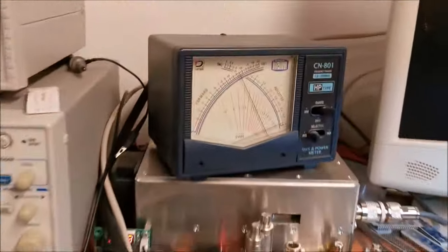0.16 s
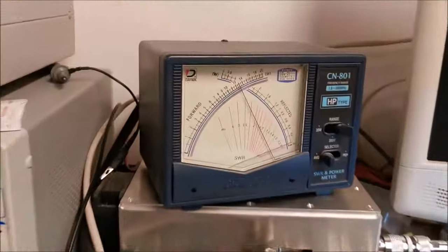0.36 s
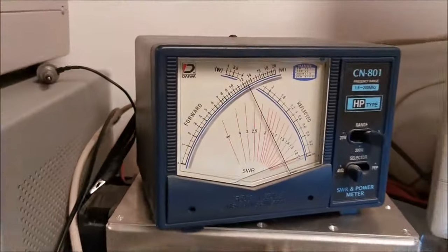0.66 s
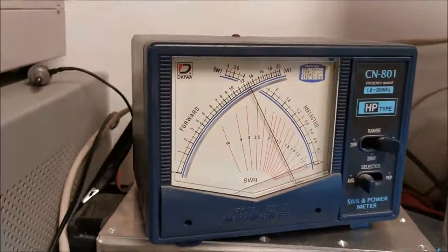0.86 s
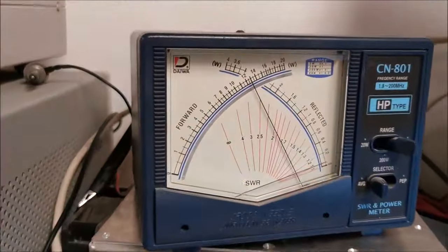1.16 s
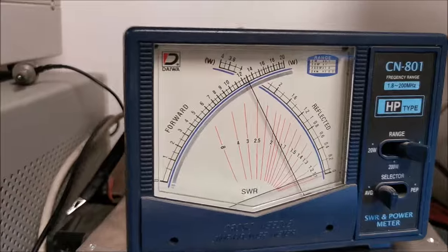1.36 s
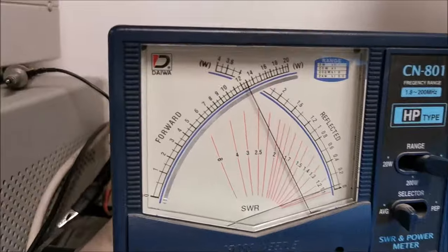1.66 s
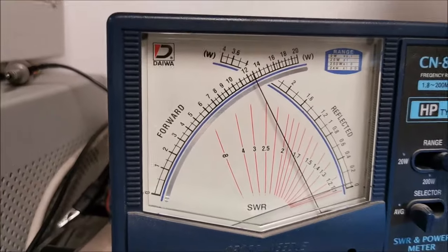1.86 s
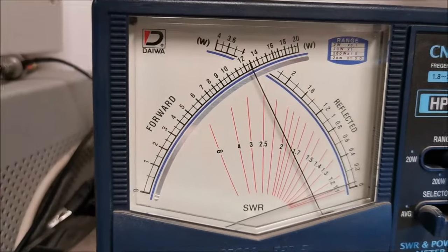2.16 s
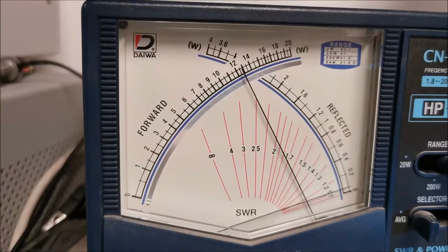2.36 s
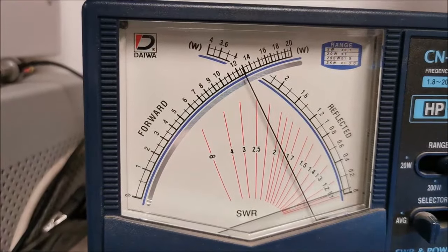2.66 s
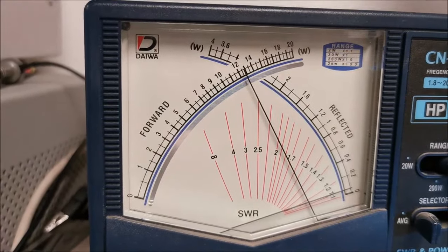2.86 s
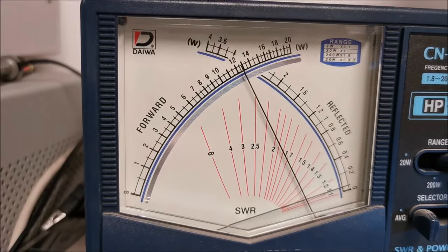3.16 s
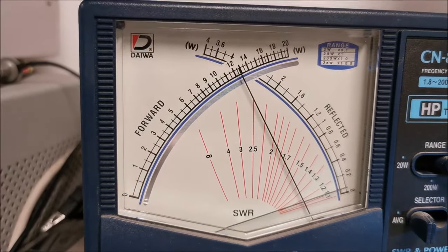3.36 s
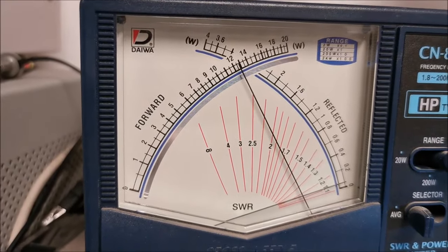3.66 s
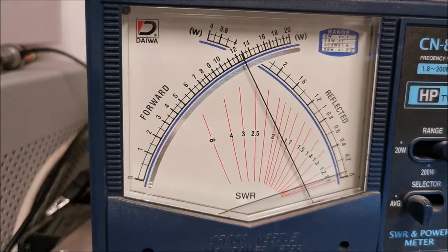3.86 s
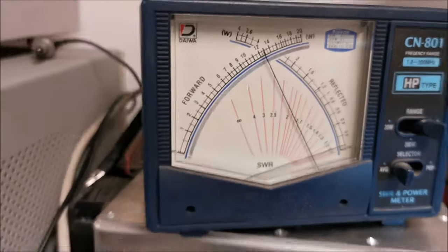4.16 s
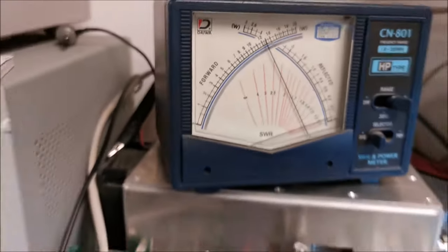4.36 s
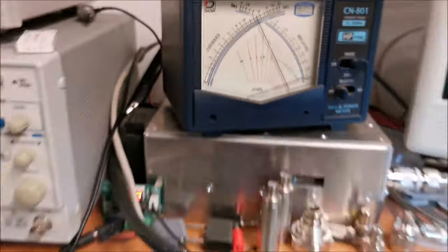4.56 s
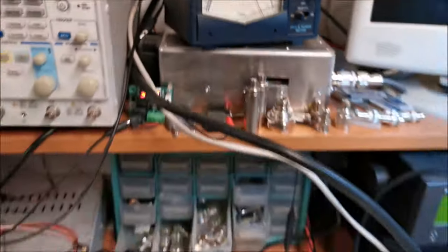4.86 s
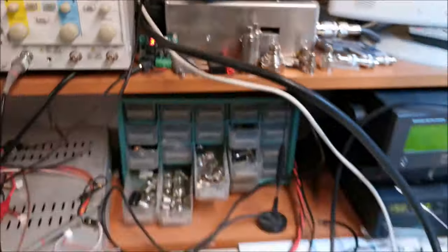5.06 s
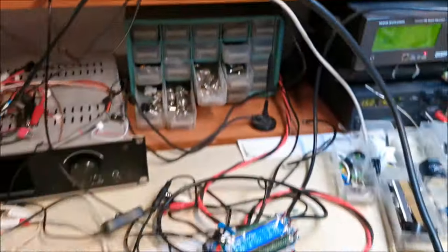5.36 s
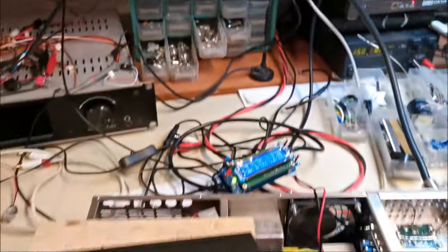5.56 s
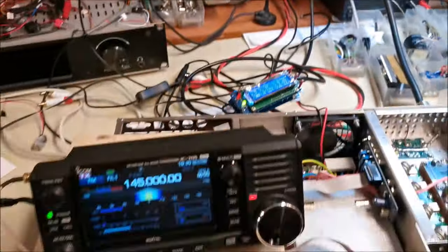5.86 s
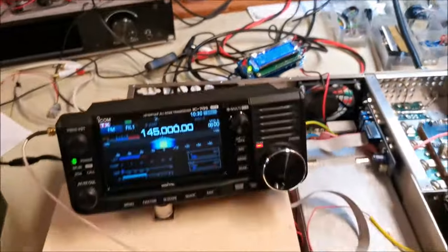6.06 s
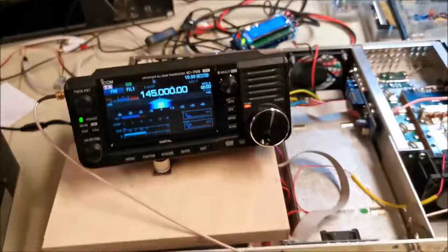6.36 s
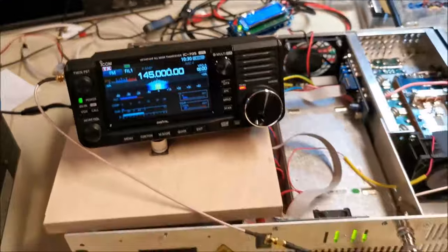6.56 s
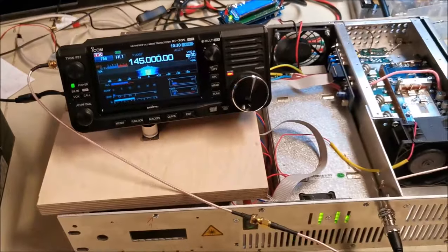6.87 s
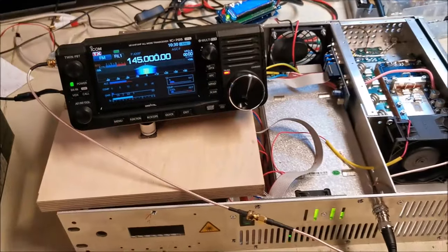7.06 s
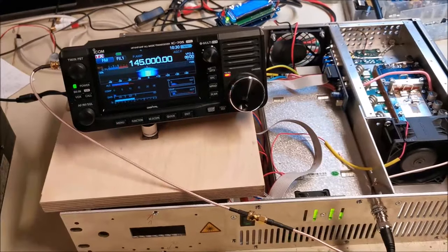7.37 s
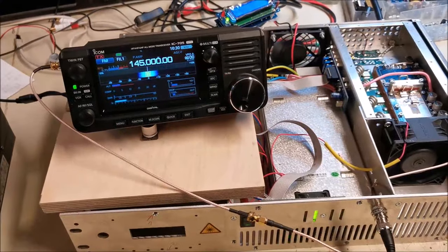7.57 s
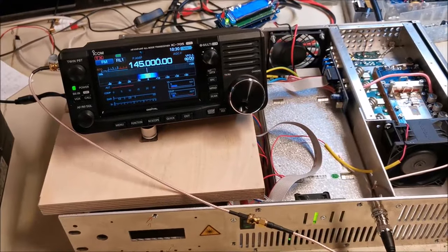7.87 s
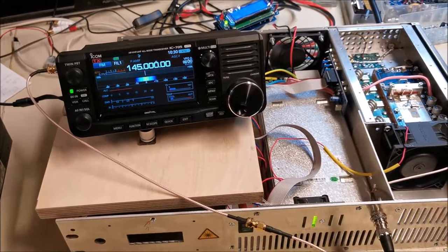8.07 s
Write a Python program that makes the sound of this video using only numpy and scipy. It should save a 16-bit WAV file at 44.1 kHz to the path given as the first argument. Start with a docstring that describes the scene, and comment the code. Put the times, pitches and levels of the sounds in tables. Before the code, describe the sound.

Rushing air and a high, steady-pitched whine come from an amplifier's cooling fan on a workbench, with a faint hum underneath. Heard through a moving phone microphone, the whine grows stronger toward the middle, then wavers and weakens, and the air briefly sounds hollow. A few short finger taps on the microphone come near the start, and faint soft thumps pass.

```python
"""A small, fast nine-bladed fan cools an amplifier on a workbench, heard from a phone's two microphones.
The phone moves from a shelf down to the open case. The fan sings its shaft orders (multiples of its
turning rate) over rushing air; standing waves swell and cancel the tones as the phone crosses them.
A slow machine hums underneath with a thin whistle, a finger bumps the right microphone port,
and a few soft thumps pass."""
import sys
import numpy as np
from scipy import signal
from scipy.io import wavfile
from scipy.ndimage import uniform_filter1d

SR = 44100
rng = np.random.default_rng(int(sys.argv[2]) if len(sys.argv) > 2 else 0)


def master(y):
    """Save y as 16-bit WAV."""
    cut = np.clip(np.atleast_2d(y).T, -1, 1)
    pcm = np.round(cut * 32767)  # scale
    wavfile.write(sys.argv[1], SR, pcm.astype(np.int16))


N = 362138
T = np.arange(N) / SR


def gain_of(db):
    """Decibels to gain."""
    return 10 ** (np.asarray(db) / 20)


def unit_rms(x):
    """Scales to rms 1."""
    return x / np.sqrt(np.mean(abs(x) ** 2) + 1e-20)


def spectrum_at(points, hz):
    """Reads a spectrum on a log-frequency axis."""
    f, value = np.transpose(points)
    return np.interp(np.log(hz + 1), np.log(f + 1), value)


def columns(rows, t):
    """Every column of a curve table at the times t."""
    times, *values = np.transpose(rows)
    return np.array([np.interp(t, times, v) for v in values])


def wobble(width_hz):
    """Complex noise low-passed to the given width, rms about 1."""
    coarse, pole = T[::20], np.exp(-2 * np.pi * width_hz * 20 / SR)
    noise = rng.standard_normal(len(coarse)) + 1j * rng.standard_normal(len(coarse))
    return np.interp(T, coarse, unit_rms(signal.lfilter([1], [1, -2 * pole, pole * pole], noise)))


def resonance(hz, centre_hz, width_hz):
    """Power of a resonance, 1 at its centre."""
    return 1 / (1 + (2 * (hz - centre_hz) / width_hz) ** 2)


def shaft_order(cycles, level_db, lead, rough, width_hz):
    """One fan tone at both microphones; eddies hitting the blades shake its size and phase."""
    shaken = (1 + rough * wobble(width_hz)) * np.exp(2j * np.pi * (cycles + rng.random()))
    return np.sqrt(2) * gain_of(level_db) * np.array([(shaken * np.exp(1j * lead)).real, shaken.real])


# Microphone position: (time [s], place [0 shelf, 1 case], hollow roar [dB], bass and treble swell [dB])
PHONE_PATH = [(0, 0.63, 9, -0.5), (.4, 0.54, 7.5, -1), (.9, 0.5, 7.5, 1.5), (1.2, 0.4, 1, 0.5),
              (1.5, 0.4, 3, -1), (1.9, 0.37, -1.5, -2), (2.6, 0.37, -2.5, -2), (3.8, 0.36, -4, -1.5),
              (4.3, 0.37, -1, -1), (4.8, 0.57, 7.5, 2), (5.1, 0.68, 11.5, 0), (5.4, .9, 9, -4),
              (5.6, 0.9, 5, -3), (5.8, 0.93, 6, -2.5), (6.1, 0.93, 2, 1), (6.6, 0.92, 2, -0.5),
              (7.2, 0.85, -5, 1), (7.7, 0.86, -1, -0.5), (8.2, 0.85, 1, 1)]
def phone_at(t):
    """The phone's place, and how that spot colours the air, at the times t."""
    return columns(PHONE_PATH, t)


# Fan shaft: (time [s], speed [turns/s])
SHAFT_SPEED = [(0, 155.2), (.35, 154.4), (.7, 154.1), (1.7, 154.3), (2.2, 154.4), (2.7, 155), (4.2, 155.1),
               (5.2, 155.45), (6.5, 155.45), (8.2, 155.6)]
def shaft_hz(t):
    """The fan's slightly drifting turning rate."""
    return columns(SHAFT_SPEED, t)[0]


# Blade-pass tone, its octave and the motor tone at the moving microphones:
# (time [s], left level [dB], right level [dB], left phase lead [rad])
BLADE_PASS = [(0, -56, -48, -2.5), (.07, -53, -45, -1.5), (.15, -55, -41.5, -1.5), (.19, -60, -58, -4),
              (.22, -60, -41, 1), (.38, -62, -42, -1.5), (.48, -55, -41, -1.3), (.62, -59, -47, -0.8),
              (.78, -53, -49, -2), (.93, -52, -54, -1), (1, -52, -68, -4), (1.08, -50, -55, -5.5),
              (1.3, -47.5, -55, -6.5), (1.5, -47, -47.5, -6), (1.9, -43.5, -42.5, -5.5),
              (2.1, -44.5, -41, -6.5), (2.3, -44.5, -40, -6), (2.37, -51, -44, -6.5),
              (2.45, -42, -37.5, -5), (2.55, -45.5, -38.5, -8), (4.12, -44.5, -39, -5.5),
              (4.32, -46.5, -40.5, -7), (4.41, -53, -50, -5), (4.48, -55, -56, -8.5),
              (4.58, -63, -40, -7.5), (4.64, -59, -41.5, -6), (4.73, -47, -38.5, -5.5),
              (4.78, -61, -43, -5.5), (4.86, -61, -49, -10.5), (4.91, -48, -44, -2.5),
              (4.96, -57, -48, -6.5), (5, -59, -67, -5), (5.04, -58, -43, -1.5), (5.09, -60, -55, -2.5),
              (5.14, -47, -41, -5.5), (5.2, -59, -51, -3), (5.3, -50, -42, -8.5), (5.4, -55, -39.5, -8),
              (5.64, -52.5, -41.5, -8), (5.9, -55.5, -48, -8), (6.6, -59, -48.5, -7.5),
              (6.72, -65, -52, -10), (6.82, -58, -65, -3.5), (6.96, -59, -48.5, -5), (7.08, -61, -48, -5.5),
              (7.14, -63, -55, -4.5), (7.38, -67, -48, -2.5), (7.52, -53, -49, -6.5), (7.57, -60, -59, -2),
              (7.64, -60, -46, -9), (7.7, -59, -59, -8), (7.8, -60, -50, -8.5), (7.92, -64, -56, -11),
              (8, -66, -50, -7.5), (8.2, -69, -69, -5)]
BLADE_OCTAVE = [(0, -70, -53, 0), (.15, -70, -57, 1), (.3, -70, -58, 0.5), (.4, -66, -54.5, 2),
                (.65, -66, -61, .5), (1, -65, -63, 0), (1.8, -67, -63, 8), (2.3, -60, -58.5, 7.5),
                (3.2, -67, -56.5, 7), (3.6, -65, -58.5, 6.5), (4.22, -66.5, -69, 7.5),
                (4.44, -61, -51, 4.5), (4.55, -70, -62, 9), (4.65, -68, -53, 6), (4.77, -72, -67, 6),
                (5, -55, -47, 8), (5.08, -68, -54, 6.5), (5.15, -57, -64, 4), (5.27, -63, -54, 5),
                (5.6, -68, -54, 3.5), (5.78, -68, -53.5, 4), (5.92, -66, -48, 2), (6.1, -65, -56, 4),
                (6.3, -63, -59, 3), (7.2, -63, -63, 5), (7.32, -61, -55, 8), (7.72, -65, -72, 6.5),
                (8.2, -60, -61, 12)]
MOTOR_TONE = [(0, -59, -70, 2.9), (.4, -54, -49, 1.9), (.65, -59, -51.5, 1.3), (1.1, -59, -70, 1.4),
              (1.4, -69, -64, 1.7), (2.1, -58.5, -55.5, 2.7), (4.2, -58, -53.5, 2.4), (4.4, -63, -54, 2.3),
              (4.6, -56, -61, .6), (4.8, -58, -52, 1.3), (5.05, -67, -63, 5.3), (5.3, -52, -50.5, 5.7),
              (6, -52, -55, 6.3), (6.5, -53.5, -53, 5.8), (8.2, -55.5, -50, 6.2)]
def main_tones(turns, place):
    """Blades and motor through standing waves; over the case the blade tones flutter more."""
    out = np.zeros((2, N))
    octave_rough = .36 * (1 + .4 * place)  # breathier over the case
    for order, rows, rough, width_hz, flutter_db in (
            (9, BLADE_PASS, .13, 32, 1.3),
            (18, BLADE_OCTAVE, octave_rough, 90, 1.3),
            (8, MOTOR_TONE, .08, 8, 0)):
        *level_db, lead = columns(rows, T)
        level_db = level_db + flutter_db * (.5 + place) * wobble(width_hz=8.5).real
        out += shaft_order(order * turns, level_db, lead, rough, width_hz)
    return out


# Third and fourth multiples of the blade rate:
# (time [s], third left [dB], third right [dB], fourth left [dB], fourth right [dB])
UPPER_OVERTONES = [(0, -72, -80, -74, -74), (.5, -60, -71, -73, -65), (.75, -65, -67, -77, -72),
                   (1, -67, -69, -78, -69), (1.3, -69, -62, -80, -66), (1.5, -68, -72, -82, -73),
                   (1.8, -78, -63, -69, -66), (2.3, -76, -62, -76, -69), (2.7, -69, -76, -78, -81),
                   (3.1, -71, -72, -83, -80), (3.5, -68, -68.5, -79.5, -68.5), (3.9, -66, -72, -78, -76),
                   (4.15, -70, -62, -77, -69), (4.5, -74, -66.5, -81, -62), (5, -65, -71, -83, -65),
                   (5.3, -73, -64, -82, -66), (5.5, -70, -62, -82, -67), (6, -72, -69, -74, -79),
                   (6.7, -73, -68, -84, -71), (7.2, -73, -67, -76, -78), (7.65, -74, -66.5, -83, -75),
                   (7.9, -76, -69, -83, -83), (8.2, -72, -66.5, -78, -71)]
def upper_overtones(turns, place):
    """High blade overtones, rougher as the phone nears the case."""
    levels_db = columns(UPPER_OVERTONES, T).reshape(2, 2, N)
    return sum(shaft_order(order * turns, db, lead=.81, rough=.03 * order * (.5 + place), width_hz=150)
               for order, db in zip((27, 36), levels_db))


# Weak fan tones: (order, shelf left [dB], shelf right [dB], case left [dB], case right [dB],
# roughness, left phase lead [rad], shake width [Hz])
WEAK_ORDERS = [(1, -66, -64, -71, -75.5, 0.099, 0.27, 5.5), (2, -78, -80, -98, -95, .4, 0.46, 16),
               (24, -95, -93, -82, -80, .3, .5, 16), (7, -76, -83, -85, -74, 0.33, 0.54, 10),
               (12, -81, -63, -91, -68, 0.43, 0.71, 12), (45, -73, -73, -78, -79, 0.71, 1.4, 150)]
# Faint fan tones, equally loud by shelf and case: (order, left level [dB], right level [dB])
FAINT_ORDERS = [(4, -82, -78), (14, -80, -74), (20, -81, -74), (29, -82, -72)]
def quiet_orders(turns, place):
    """The lesser multiples of the shaft rate, behind the main tones."""
    out = np.zeros((2, N))
    for order, *ports_db, rough, lead, width_hz in WEAK_ORDERS:
        shelf_db, case_db = np.reshape(ports_db, (2, 2, 1))
        level_db = (1 - place) * shelf_db + place * case_db
        out += shaft_order(order * turns, level_db, lead, rough, width_hz)
    for order, *ports_db in FAINT_ORDERS:
        out += shaft_order(order * turns, np.array(ports_db)[:, None], lead=.48, rough=.59, width_hz=16)
    return out


# Hiss bands, relative to the air: (blade-rate multiple, width [Hz], by the shelf [dB], over the case [dB])
HISS_BANDS = [(0.998, 87, 10.5, 12), (.96, 156, 5.5, 7.5), (2.04, 440, -1.5, 2.5), (2.17, 220, -11, 1),
              (3.0, 565, 0, 8), (3.8, 900, -7, 2), (5, 300, -3, 0)]
def blade_turbulence(hz, t, place):
    """Noise power that turbulence spreads around multiples of the blade rate."""
    usual_db = -63  # of the upper overtones on the right; the hiss around them swells as they do
    _, third_db, _, fourth_db = columns(UPPER_OVERTONES, t) - usual_db
    swell_db = {3: .92 * third_db, 4: .92 * fourth_db}
    blade_hz = 9 * shaft_hz(t)
    power = 0
    for multiple, width_hz, shelf_db, case_db in HISS_BANDS:
        level_db = (1 - place) * shelf_db + place * case_db + swell_db.get(round(multiple), 0)
        power += gain_of(level_db) ** 2 * resonance(hz, multiple * blade_hz, width_hz) ** 2
    return power


# Resonances of the hollow roar, among them the amplifier chassis ringing near 650 Hz: (frequency [Hz], width
# [Hz], relative level [dB])
HOLLOW_MODES = [(569, 85, 2), (651, 76, 4), (755, 46, 0.5), (1060, 1500, -8)]
def hollow_roar(hz, hollow_db):
    """Power that the hollow roar, with the chassis ringing, adds to the air."""
    return sum(gain_of(hollow_db + db) ** 2 * resonance(hz, f, width) for f, width, db in HOLLOW_MODES)


# Air at each microphone, by the shelf and over the case: (frequency [Hz], base density [dB per Hz])
AIR_SHELF_LEFT = [(40, -87), (100, -89), (240, -107), (310, -93), (450, -95), (590, -101), (680, -92.5),
                  (950, -96), (1600, -85), (2200, -92.5), (3500, -93.5), (6800, -94), (10000, -100),
                  (15500, -102)]
AIR_SHELF_RIGHT = [(40, -99), (100, -100), (230, -108), (320, -92.5), (450, -88.5), (590, -99.5),
                   (680, -87), (950, -88.5), (1750, -84), (2300, -80), (3700, -90), (5200, -86),
                   (6300, -92), (7800, -105), (10500, -102), (14000, -118), (15500, -112)]
AIR_CASE_LEFT = [(40, -101), (110, -99), (250, -93), (360, -96.5), (480, -100.5), (680, -97), (950, -89.5),
                 (1700, -96), (2200, -94), (3500, -94), (6800, -92), (10000, -101), (15500, -103)]
AIR_CASE_RIGHT = [(40, -103), (110, -102), (250, -93.5), (360, -97.5), (480, -99), (660, -88.5),
                  (800, -90.5), (1050, -89), (1750, -89), (2300, -86), (3700, -85.5), (5600, -88.5),
                  (6300, -95.5), (7800, -108), (10500, -100), (12500, -106), (14000, -121), (15500, -112)]
# Likeness of the air at the two microphones: (frequency [Hz], coherence [0-1])
AIR_COHERENCE = [(60, .8), (290, .85), (500, .75), (690, .85), (1400, .7), (1900, .35), (3100, .33),
                 (5000, .25), (7500, .02)]
def rushing_air():
    """The fan's airflow: random short-time spectra, coloured by where the phone is."""
    frames, hz = N // 512 + 5, np.fft.rfftfreq(2048, 1 / SR)[:, None]
    t = np.arange(frames) * 512 / SR
    place, hollow_db, swell_db = phone_at(t)
    left_re, left_im, apart_re, apart_im, patches, *comb = rng.standard_normal((frames, 1025, 7)).T

    left, apart = left_re + 1j * left_im, apart_re + 1j * apart_im
    right_lag_s = .00013 * (1 - place)  # by the shelf the left microphone hears first
    coherence = spectrum_at(AIR_COHERENCE, hz) * np.exp(-2j * np.pi * hz * right_lag_s)
    right = coherence * left + np.sqrt(1 - abs(coherence) ** 2) * apart

    shelf_db = np.array([spectrum_at(AIR_SHELF_LEFT, hz), spectrum_at(AIR_SHELF_RIGHT, hz)])
    case_db = np.array([spectrum_at(AIR_CASE_LEFT, hz), spectrum_at(AIR_CASE_RIGHT, hz)])
    level_db = (1 - place) * (shelf_db + 1) + place * (case_db - 1)
    treble, bass = 1 / (1 + (7000 / (hz + 1)) ** 4), 1 / (1 + (hz / 450) ** 6)
    level_db += (.58 * treble + .46 * bass) * swell_db
    level_db -= .21 * bass * np.maximum(hollow_db, 0)  # the bass thins as the hollow roars

    # the treble flickers, and patches of the spectrum swell and fade
    flicker = unit_rms(uniform_filter1d(rng.standard_normal(frames), size=4))
    level_db += .5 * flicker / (1 + (5000 / (hz + 1)) ** 4)
    patches = uniform_filter1d(patches, size=40, axis=0)
    level_db += .79 * unit_rms(uniform_filter1d(patches, size=16, axis=1))
    # reflections from bench and walls comb each side; the comb drifts as the phone moves
    comb = uniform_filter1d(np.array(comb), size=4, axis=1)
    comb = unit_rms(uniform_filter1d(comb, size=90, axis=2))
    level_db += 2.54 * comb * (1 - .48 * treble) * hz / (hz + 400)

    power = 1 + blade_turbulence(hz, t, place) + hollow_roar(hz, hollow_db)
    spectra = np.array([left, right]) * gain_of(level_db) * np.sqrt(power)
    white_rms = signal.istft(left, nperseg=2048, noverlap=1536)[1].std()
    air = signal.istft(spectra, nperseg=2048, noverlap=1536)[1][:, :N]
    return air / white_rms * np.sqrt(SR / 2)


def whistle(place, hollow_db, pitch_hz=750):
    """A thin wavering tone, lifted by the hollow under the shelf and fainter over the case."""
    tone = unit_rms(1 + .6 * wobble(width_hz=2.8)) * np.exp(2j * np.pi * pitch_hz * T)
    level_db = -71.5 + .6 * hollow_db - 6 * place
    return np.sqrt(2) * gain_of(level_db) * tone.real * gain_of([[-2.5], [2.5]])


# Machine hum by the shelf: (frequency [Hz], left level [dB], right level [dB], drop over the case [dB])
HUM_TONES = [(20.46, -67, -68.5, .3), (40.92, -72.5, -74.5, 1), (99.98, -81.5, -80.5, 6)]
def machine_hum(place):
    """Steady low tones of a slow machine, in phase at both microphones."""
    out = np.zeros((2, N))
    for hz, left_db, right_db, drop_db in HUM_TONES:
        level_db = np.array([[left_db], [right_db]]) - drop_db * place
        out += gain_of(level_db) * np.sin(2 * np.pi * (hz * T + rng.random()))
    return np.sqrt(2) * out


# Finger right on the port: (time [s], push level [dB], sign, width [ms], rebound re push [dB])
FINGER_BUMPS = [(.0745, -47, 1, .5, -14), (.0805, -46, 1, .6, -8), (.0832, -46, -1, .5, -12),
                (.6033, -26.5, -1, .29, -7), (.6063, -38, -1, .3, -3), (2.123, -31, -1, .29, -6)]
def finger_bumps():
    """A short pressure push in the right port, then the diaphragm swings back and settles."""
    out, lead_in_s = np.zeros(N), .01
    ms = (T[:2200] - lead_in_s) * 1000
    for time_s, db, sign, width_ms, rebound_db in FINGER_BUMPS:
        push = np.exp(-.5 * (ms / width_ms) ** 2)
        after_ms = np.maximum(ms - width_ms, 0)
        swing = 1.6 * np.exp(-after_ms / .6)
        settle = .4 * np.exp(-after_ms / 7) * np.cos(2 * np.pi * after_ms / 24)
        rebound = (1 - np.exp(-after_ms / .25)) * (swing + settle)
        start = round((time_s - lead_in_s) * SR)
        out[start:start + len(ms)] += sign * gain_of(db) * (push - gain_of(rebound_db) * rebound)
    return out * gain_of([[-28], [0]])


# Thumps, alike at both microphones: (time [s], envelope peak [dB], pitch [Hz], width [ms])
SOFT_THUMPS = [(.82, -68, 100, 18), (2.125, -62, 85, 12), (6.565, -62, 88, 13), (6.8, -66, 100, 18)]
def soft_thumps():
    """Each thump is a few low cycles under a bell-shaped envelope."""
    out = np.zeros(N)
    for time_s, db, hz, width_ms in SOFT_THUMPS:
        envelope = np.exp(-.5 * ((T - time_s) * 1000 / width_ms) ** 2)
        out += gain_of(db) * envelope * np.sin(2 * np.pi * hz * (T - time_s))
    return out


def scene():
    """The workbench in stereo, from the moving phone."""
    place, hollow_db, _ = phone_at(T)
    turns = np.cumsum(shaft_hz(T)) / SR
    fan = main_tones(turns, place) + upper_overtones(turns, place) + quiet_orders(turns, place)
    background = rushing_air() + whistle(place, hollow_db) + machine_hum(place)
    return fan + background + finger_bumps() + soft_thumps()


def record(dry):
    """The phone's band limit cuts off the highest treble."""
    edge_hz = 15780
    lowpass = signal.firwin(1023, edge_hz, window=("kaiser", 9), fs=SR)
    return signal.oaconvolve(dry, lowpass[None], "same")


dry = scene()
out = record(dry)
master(out)
```